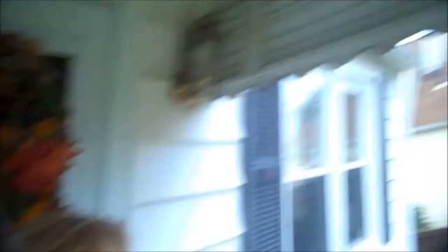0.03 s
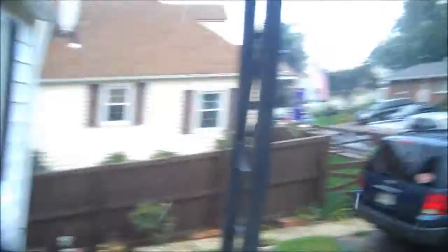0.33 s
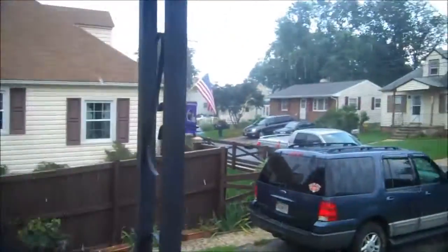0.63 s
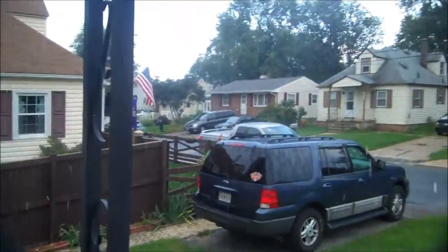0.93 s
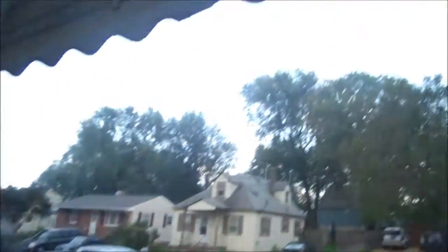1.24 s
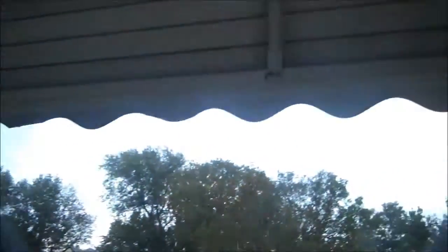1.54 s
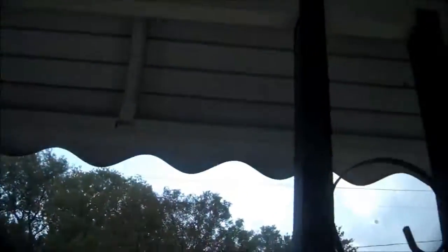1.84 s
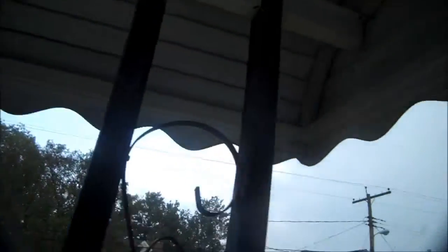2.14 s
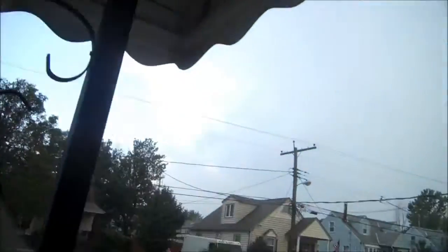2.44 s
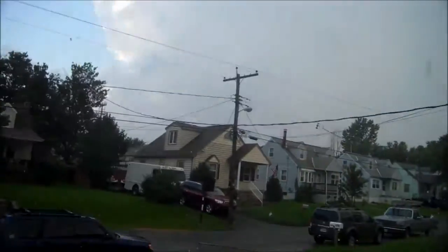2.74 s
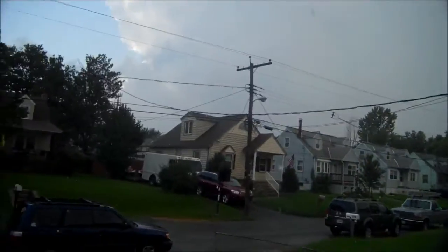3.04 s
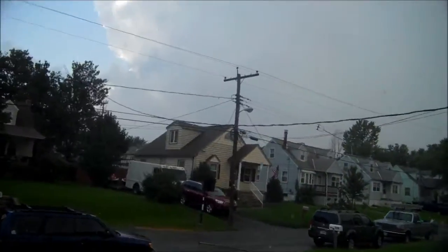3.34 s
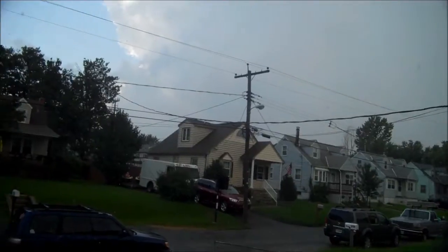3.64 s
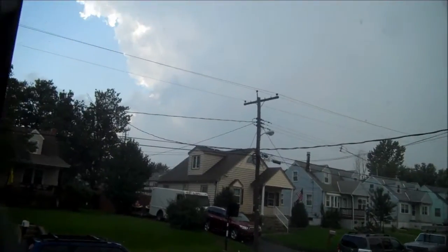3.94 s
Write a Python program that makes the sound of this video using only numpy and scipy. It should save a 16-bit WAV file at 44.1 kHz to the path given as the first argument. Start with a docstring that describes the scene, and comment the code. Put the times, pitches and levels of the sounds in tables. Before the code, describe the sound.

Hail strikes a metal porch awning, heard close from below. Bright, sizzling hits and small clinks come in a dense, uneven rattle, with occasional hollow knocks from bigger stones. The storm hisses faintly out in the yard.

```python
"""Under an aluminium porch awning in a hailstorm, a close stereo pair listening from below.
Each stone sets the thin slats sizzling near 6 kHz over a duller clatter and a clink of its own;
a few big ones knock the whole panel. Small pellets overhead and the wash of the storm out in
the yard fill the gaps. The recorder ducks and clips on the loudest blows."""
import sys
import numpy as np
from scipy import signal
from scipy.fft import rfft, irfft
from scipy.io import wavfile
from scipy.ndimage import uniform_filter1d

SR = 44100
rng = np.random.default_rng(int(sys.argv[2]) if len(sys.argv) > 2 else 0)


def persist_wave(psi):
    """Save psi, clipped to +-1, as 16-bit WAV."""
    counts = np.round(np.clip(psi, -1, 1) * 32767).astype(np.int16)
    wavfile.write(sys.argv[1], SR, np.atleast_2d(counts).T)


N = 176400

# Bright spectrum of the struck slats: frequency_hz, level_db
SIZZLE_SPECTRUM = [(300, -28.5), (1800, -15.5), (2850, -7.5), (4200, -9.5), (5100, -2), (5650, 1.5),
                   (6400, -1), (7300, -2.5), (8500, -9.5), (10000, -19), (14000, -30)]
# Duller spectrum of the clatter beneath it: frequency_hz, level_db
CLATTER_SPECTRUM = [(40, -29), (150, -1.5), (350, -4), (580, -3), (750, 0.5), (1050, 1.5), (1400, -5.5),
                    (2500, -0.5), (4000, -3), (9000, -35)]
ATTACK_S = 0.00056  # rise of a sharp blow


def amp(db):
    """Decibels to gain."""
    return 10 ** (np.asarray(db) / 20)


def unit(x):
    """Scales to an rms of one."""
    return x / np.sqrt(np.mean(x ** 2) + 1e-20)


def read(points, hz):
    """Reads a table along a log-frequency axis."""
    f, value = np.transpose(points)
    return np.interp(np.log(hz + 1), np.log(f + 1), value)


def add(mix, start_s, sound):
    """Mixes a sound in at its start time."""
    part = mix[:, max(round(start_s * SR), 0):][:, :sound.shape[-1]]
    part += sound[..., :part.shape[-1]]


def colour(x, spectrum, size=4096):
    """Causal filter with the given spectrum and unit energy."""
    log_gain = np.log(amp(read(spectrum, abs(np.fft.fftfreq(size, 1 / SR)))))
    minimum_phase = np.exp(np.conj(signal.hilbert(log_gain)))
    taps = np.fft.ifft(minimum_phase).real[:size // 2]
    return signal.oaconvolve(x, taps[None] / np.linalg.norm(taps), axes=1)[:, :N]


def resonate(x, hz, width_hz):
    """One resonance, scaled to an rms of one."""
    r = np.exp(-np.pi * width_hz / SR)
    return unit(signal.lfilter([1, 0, -1], [1, -2 * r * np.cos(2 * np.pi * hz / SR), r * r], x))


def dying(t60_s, attack_s=ATTACK_S, size=16384):
    """Quick rise, exponential decay."""
    t = np.arange(size) / SR
    return np.minimum(t / attack_s, 1) * np.exp(-np.log(1000) * t / t60_s)


def sine(hz, size=16384):
    """Steady vibration at one pitch."""
    return np.sin(2 * np.pi * hz * np.arange(size) / SR)


def shiver(size=16384):
    """Dense vibration of a thin sheet, as mid and side noise."""
    return rng.standard_normal((2, size))


def yard_wash(level_db=-29.5):
    """The storm farther off in the yard blurs into steady noise."""
    # Spectrum of the storm: frequency_hz, level_db
    wash_spectrum = [(25, -16), (80, -7), (200, -8), (800, -4), (1470, -11.5), (4140, -9.5), (5540, -1.5),
                     (7030, -5.5), (14000, -36.5)]
    return amp(level_db) * colour(rng.standard_normal((2, N)), wash_spectrum)


def pellets(per_s=110, level_db=-27, spread_db=1.5):
    """Small pellets tick all over the awning at random; their powers add."""
    strength = amp(level_db + spread_db * np.minimum(rng.exponential(1, N), 2.5))
    hits = strength * (rng.random(N) < per_s / SR)

    def patter(t60_s):
        power = signal.oaconvolve(hits ** 2, dying(t60_s) ** 2)[:N]
        return rng.standard_normal((2, N)) * np.sqrt(abs(power))

    ticks, clatter = patter(t60_s=.035), patter(t60_s=.09)
    return colour(ticks, SIZZLE_SPECTRUM) + amp(-11) * colour(clatter, CLATTER_SPECTRUM)


def awning_ring(blows, level_db=-46.5):
    """Stirred by the blows, the whole awning rings on at a few pitches."""
    # Long-ringing modes of the awning: pitch_hz, gain_db, t60_s
    modes = [(107, -20.5, 0.36), (482, -20, 0.32), (872, -27, 0.11), (1045, -25, 0.28), (2850, -13, 0.069)]
    t = np.arange(SR // 2) / SR
    ring = sum(amp(db) * np.cos(2 * np.pi * hz * t) * amp(-60 * t / t60_s) / np.sqrt(t60_s)
               for hz, db, t60_s in modes)
    return amp(level_db) * signal.oaconvolve(blows, ring[None], axes=1)[:, :N]


def panel(hz):
    """The short hollow tone of one panel."""
    return unit(sine(hz)) * dying(t60_s=.075)


def clink(count=7, low_hz=1200, high_hz=4800):
    """Each spot of the sheet rings with its own handful of unrelated modes."""
    edges_hz = np.geomspace(low_hz, high_hz, count + 1)
    modes = np.array([sine(hz) for hz in rng.uniform(edges_hz[:-1], edges_hz[1:])])
    return unit(rng.standard_normal((2, count)) @ modes) * dying(t60_s=.12)


def sizzle(attack_s, crack_t60_s=.021, ring_t60_s=.14, hold_s=.012):
    """A crack, then a ring that holds briefly and dies; each slat favours its own pitch."""
    sheet = shiver()
    slat_hz = 5810 * np.exp(.15 * rng.uniform(-2.24, 1))
    slat = resonate(sheet, slat_hz, width_hz=900)
    # Waves cross the awning and return before the ring dies.
    hold_level = amp(-60 * hold_s / ring_t60_s)
    ring = np.minimum(dying(ring_t60_s, attack_s) / hold_level, 1)
    envelope = np.hypot(dying(crack_t60_s, attack_s), amp(-6) * ring)
    return unit(sheet + amp(-11) * slat) * envelope


def hailstones():
    """Each stone overhead makes the slats sizzle, clatter and clink, and rings one panel."""
    # Ordinary stones landing: start_s, level_db
    stones = [(0.0004, -6.5), (0.016, -6.5), (0.0808, -12.5), (0.1057, -14), (0.1406, -6.5), (0.154, -1.5),
              (0.2696, -11.5), (0.3249, -4.5), (0.3853, -9), (0.4242, 0), (0.5456, -3), (0.561, -9),
              (0.5814, -4), (0.6307, -4.5), (0.7047, -11.5), (0.827, -7.5), (0.8684, -6), (0.912, -2),
              (0.9428, -9), (0.9714, -13.5), (1.007, -8), (1.0275, -8.5), (1.042, -7), (1.0485, -2),
              (1.0592, -4.5), (1.1162, -9), (1.1234, -2), (1.148, -11.5), (1.219, -5.5), (1.286, -6.5),
              (1.3289, -12.5), (1.385, -6.5), (1.4075, -13), (1.4265, -8.5), (1.52, -9.5), (1.554, -9.5),
              (1.5784, -3), (1.6025, -7.5), (1.6641, -7), (1.678, -9), (1.705, -7.5), (1.7228, -1),
              (1.855, -10.5), (1.864, -6.5), (1.872, -3), (1.912, -10.5), (1.9518, -5), (2.0018, -9),
              (2.02, -10.5), (2.0555, -10.5), (2.129, -6), (2.1457, -9), (2.168, -3), (2.233, -6.5),
              (2.2814, -9.5), (2.3817, -8), (2.4659, -7), (2.4899, -9.5), (2.544, -13), (2.561, -5.5),
              (2.6598, -9.5), (2.6826, -5.5), (2.734, -3), (2.748, -15), (2.8605, -4.5), (2.8893, -3.5),
              (2.913, -13), (2.9603, -7.5), (2.982, -13), (3.111, -10), (3.149, -6.5), (3.191, -2),
              (3.2252, -4.5), (3.2497, -11), (3.3466, -10.5), (3.4495, -5.5), (3.4666, -13), (3.521, -9.5),
              (3.542, -15), (3.5727, -10.5), (3.5943, -7.5), (3.738, -12), (3.7924, -5.5), (3.8171, -10.5),
              (3.833, -1), (3.8697, -5), (3.8947, -7), (3.9227, -7), (3.9719, -9.5)]
    bright, dull, tones = np.zeros((3, 2, N))
    for start_s, db in stones:
        add(bright, start_s, amp(db - 8) * sizzle(attack_s=.0016))
        add(dull, start_s, amp(db - 20) * shiver() * dying(t60_s=.3, attack_s=.0049))
        add(tones, start_s, amp(db - 21) * clink())
        panel_hz = 888 * np.exp(.151 * rng.standard_normal())
        add(tones[:1], start_s, amp(db - 26.5) * panel(panel_hz))  # mid only
    return colour(bright, SIZZLE_SPECTRUM) + colour(dull, CLATTER_SPECTRUM) + tones


def big_stones():
    """A big stone shatters with a hollow knock: slats sizzle, a panel rings, frame and beam shake."""
    # Big stones landing: start_s, sizzle_db, knock_db, panel_hz, panel_db, thud_db, splinter_db
    knocks = [(0.2156, -5.5, -11.5, 1650, -13.5, -26, -10), (0.3957, -8, -10, 490, -15, -17, -11),
              (0.774, -10, -17.5, 402, -21.5, -45, -14), (1.1377, -11, -16, 818, -22.5, -17, -16),
              (2.3086, -8.5, -14.5, 1010, -20, -20.5, -23), (2.7714, -7, -22, 950, -31, -38, -15),
              (2.9978, -5.5, -13, 953, -24, -37, -11.5), (3.1553, -7.5, -16, 1070, -26, -36, -24),
              (3.2871, -10, -18.5, 1175, -21, -33, -14.5), (3.6289, -7.5, -7.5, 331, -14, -27, -10.5)]
    # Spectrum of the hollow knock: frequency_hz, level_db
    knock_spectrum = [(40, -21), (85, -1), (280, 1), (900, 5), (1400, 0), (2400, 3), (8000, -11.5),
                      (14000, -35)]
    frame_thud = np.array([[1], [-.5]]) * sine(hz=46.4) * dying(t60_s=.064)
    beam_hum = sine(hz=110.5) * dying(t60_s=.45)
    bright, dull, direct = np.zeros((3, 2, N))
    for start_s, sizzle_db, knock_db, panel_hz, panel_db, thud_db, splinter_db in knocks:
        add(bright, start_s, amp(sizzle_db) * sizzle(ATTACK_S))
        splinter = resonate(shiver(), hz=4300, width_hz=4000) * dying(t60_s=.04)
        add(direct, start_s, amp(splinter_db) * splinter)
        add(dull, start_s, amp(knock_db) * shiver() * dying(t60_s=.19))
        add(dull[:1], start_s + ATTACK_S, amp([knock_db + 19]))  # one-sample snap atop the knock
        add(direct[:1], start_s, amp(panel_db) * panel(panel_hz))
        add(direct, start_s, amp(thud_db) * frame_thud)
        # The hum grows as the square of the knock: only the hardest stirs the beam.
        add(direct[:1], start_s, amp(2 * knock_db - 14.5) * beam_hum)
    return colour(bright, SIZZLE_SPECTRUM) + colour(dull, knock_spectrum) + direct


def microphones(mid_side):
    """Spreads mid and side over two close microphones; likeness and balance vary with frequency."""
    # Likeness of left and right: frequency_hz, correlation
    likeness = [(30, 0), (90, .6), (350, .86), (700, .88), (1900, .55), (3100, .08), (4300, .08),
                (4750, .85), (5500, .56), (6400, .9), (7400, .35)]
    # Balance of the pair: frequency_hz, left_minus_right_db
    balance = [(4800, -1), (5600, -6), (6400, 2.5), (7400, 5), (8300, 5.5), (14000, 12)]
    hz = np.fft.rfftfreq(N, 1 / SR)
    correlation = np.clip(read(likeness, hz), -1, 1)
    lean = amp(read(balance, hz) / 2)
    mid, side = rfft(mid_side)
    mid *= np.sqrt((1 + correlation) / 2)
    side *= np.sqrt((1 - correlation) / 2)
    return irfft(np.array([(mid + side) * lean, (mid - side) / lean]), N)


def scene():
    """Hail on the awning overhead, with the wash of the yard behind."""
    wash = yard_wash()
    blows = hailstones() + big_stones() + pellets()
    return microphones(wash + blows + awning_ring(blows))


def record(dry, threshold_db=-14, duck_share=.4, release_db_per_s=30, makeup_db=2, cutoff_hz=14400):
    """The recorder's gain control ducks after loud blows, peaks clip, and the top treble is cut."""
    power = uniform_filter1d((dry ** 2).mean(0), size=200)
    power_db = 10 * np.log10(abs(power) + 1e-12)
    fall_db = np.arange(N) * release_db_per_s / SR
    peak_db = np.maximum.accumulate(power_db + fall_db) - fall_db
    over_db = np.maximum(peak_db - threshold_db, 0)
    duck_db = duck_share * signal.lfilter(np.ones(256) / 256, 1, over_db)
    clipped = np.clip(dry * amp(makeup_db - duck_db), -.93, .93)
    lowpass = signal.firwin(511, cutoff_hz, window=("kaiser", 8), fs=SR)
    return signal.oaconvolve(clipped, lowpass[None], "same")


dry = scene()
out = record(dry)
persist_wave(out)
```